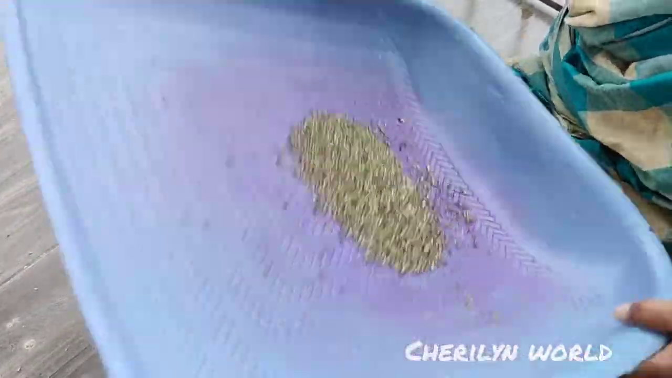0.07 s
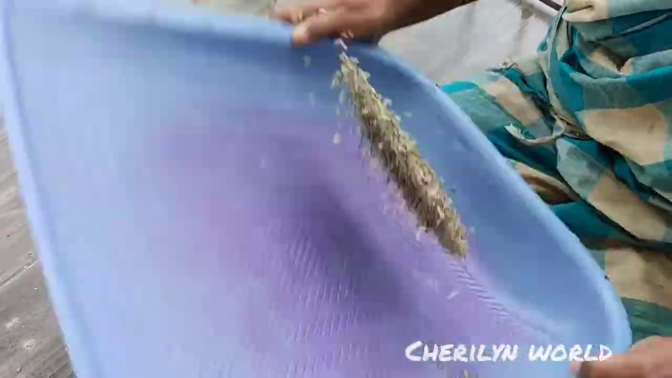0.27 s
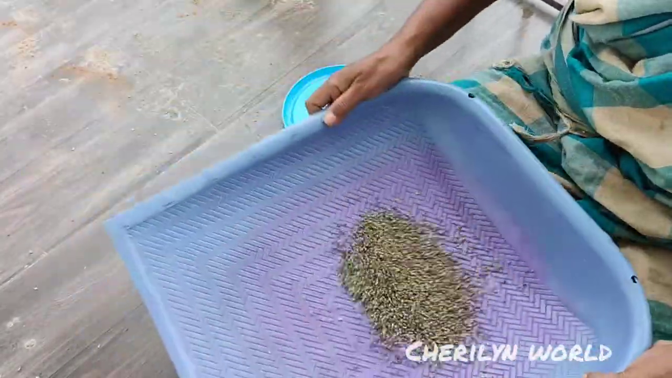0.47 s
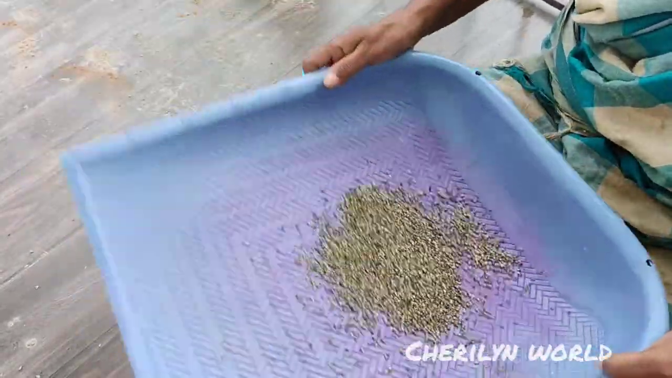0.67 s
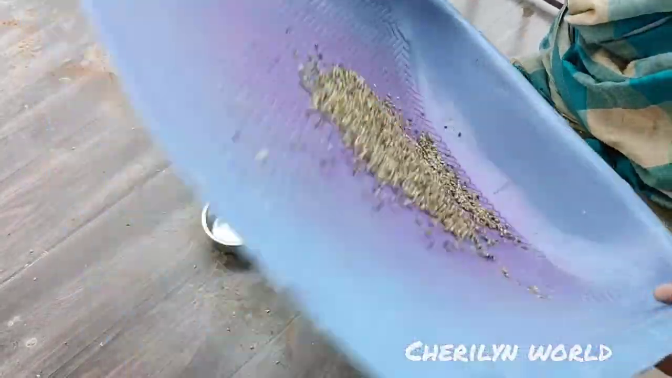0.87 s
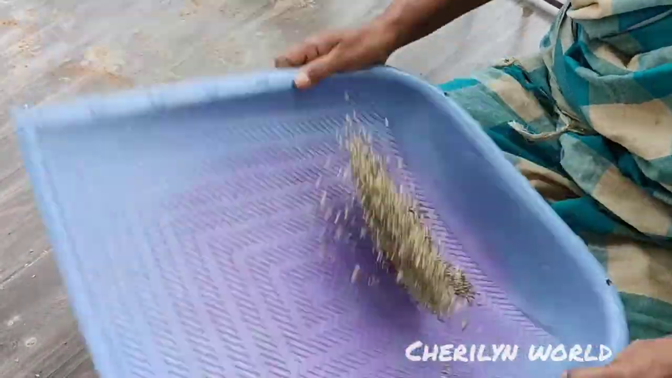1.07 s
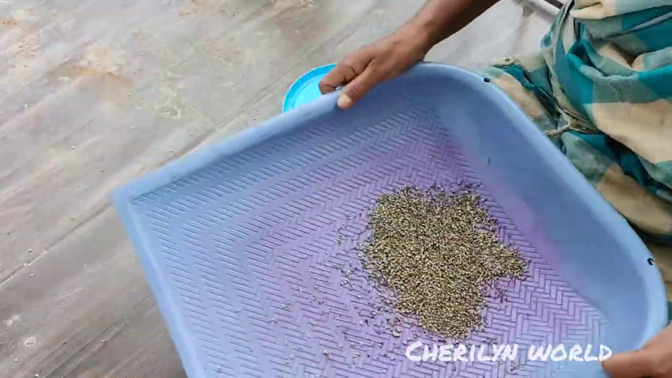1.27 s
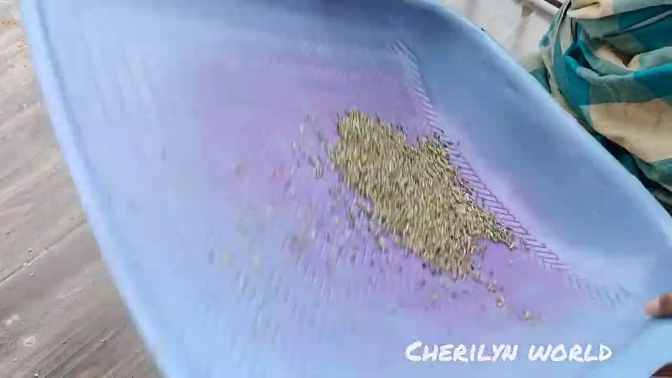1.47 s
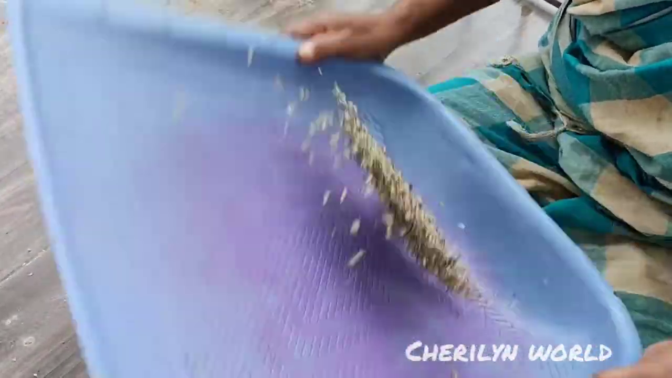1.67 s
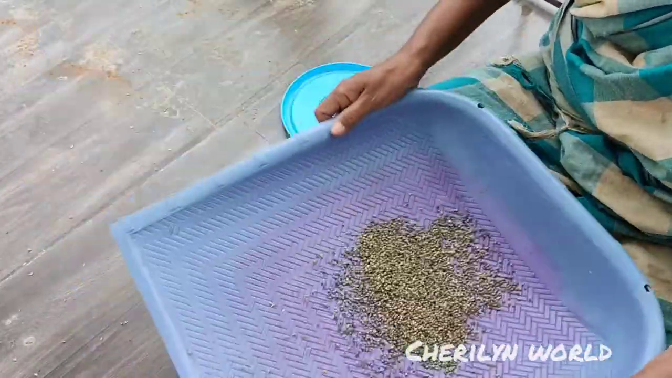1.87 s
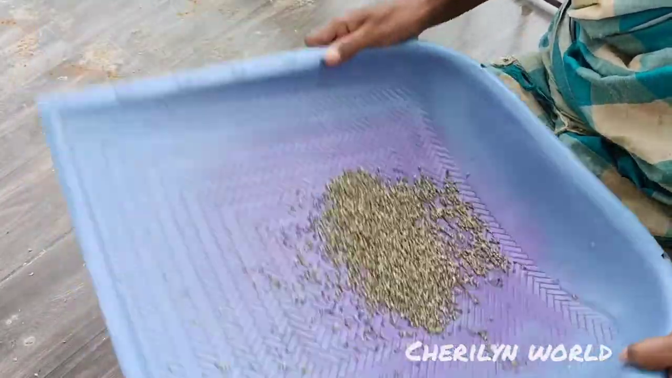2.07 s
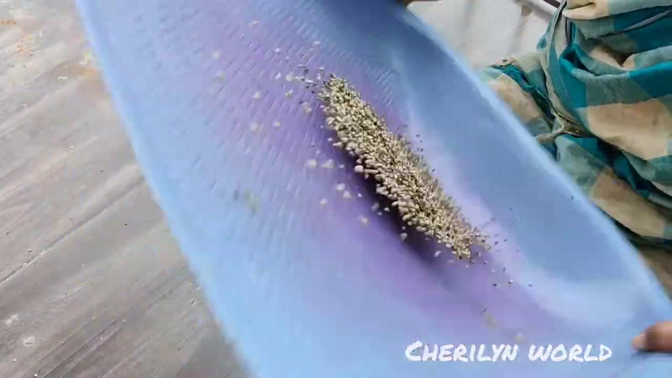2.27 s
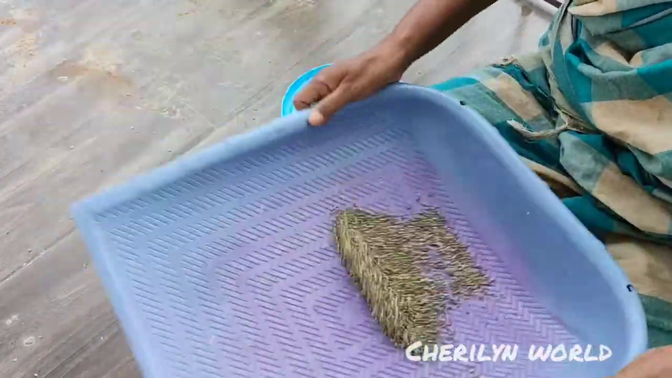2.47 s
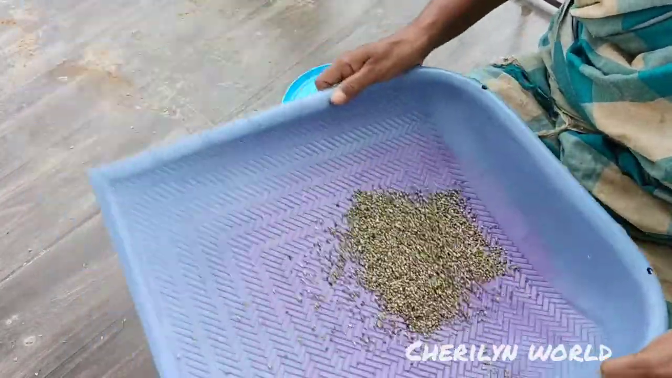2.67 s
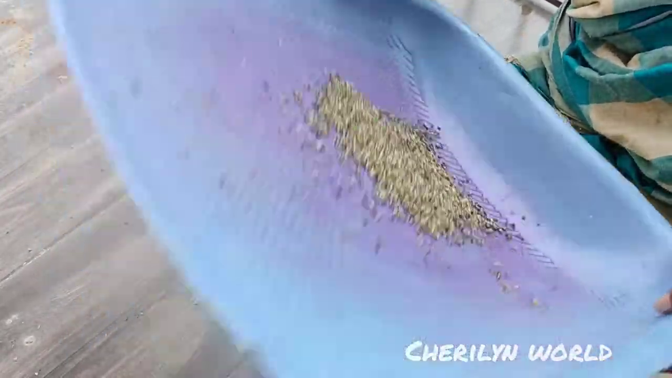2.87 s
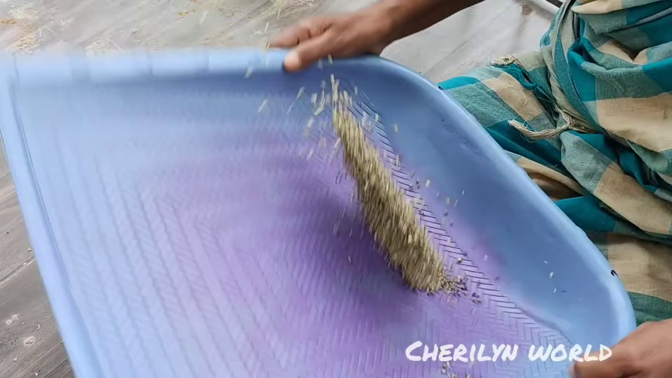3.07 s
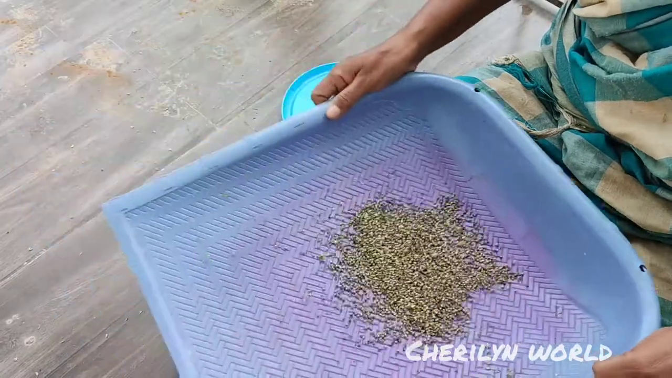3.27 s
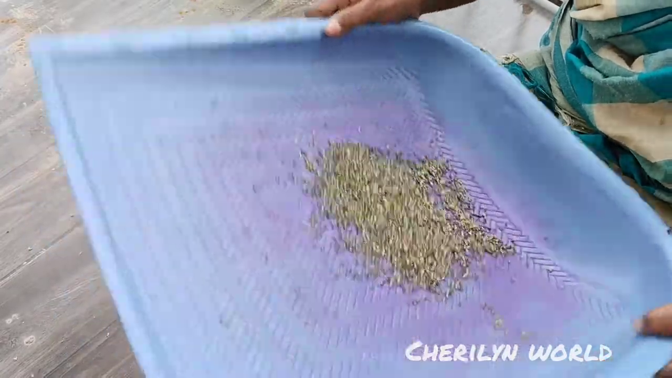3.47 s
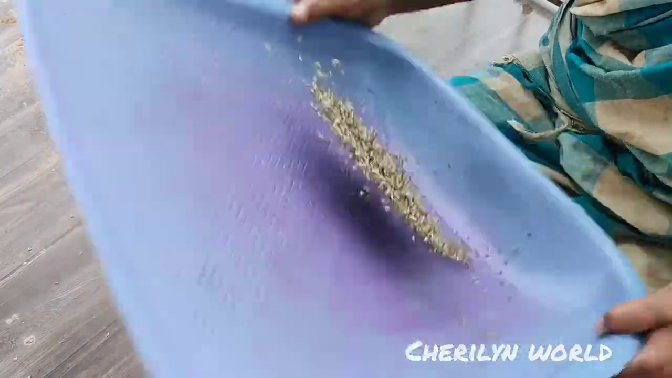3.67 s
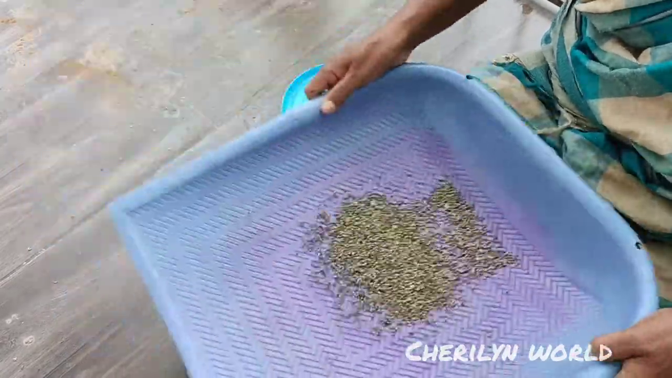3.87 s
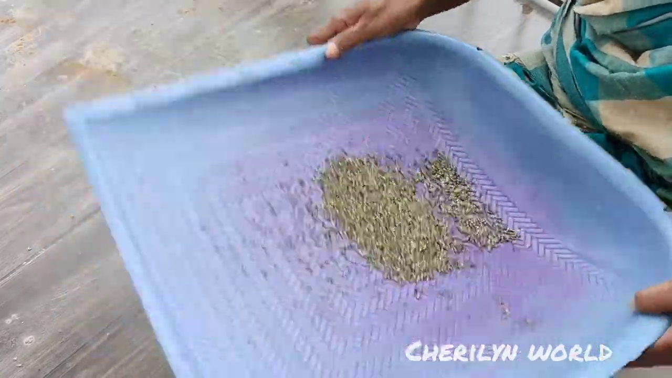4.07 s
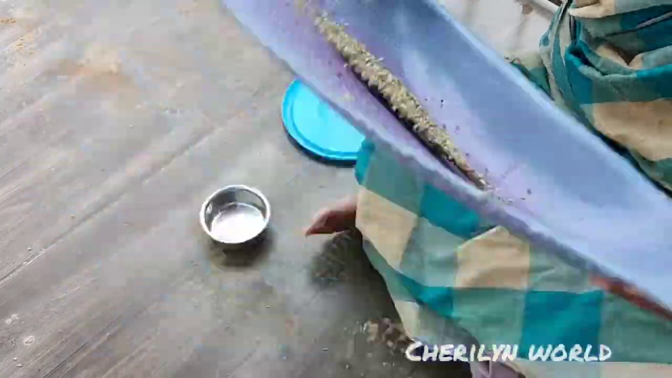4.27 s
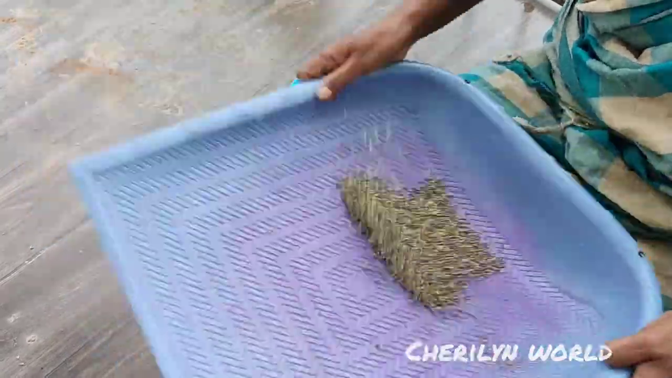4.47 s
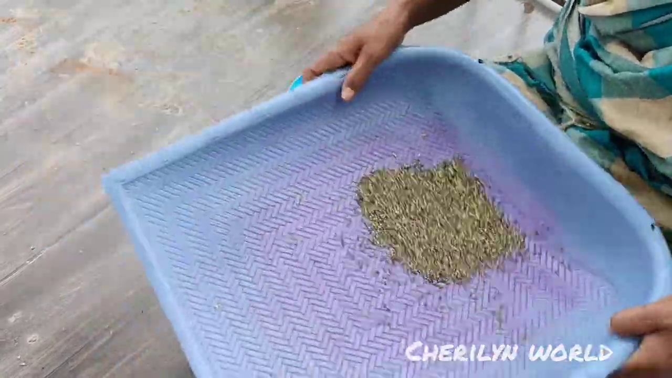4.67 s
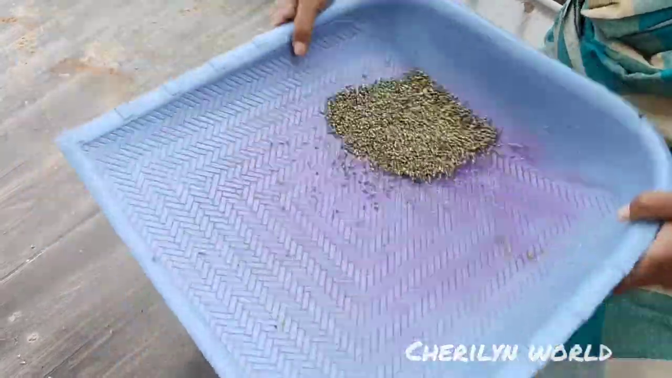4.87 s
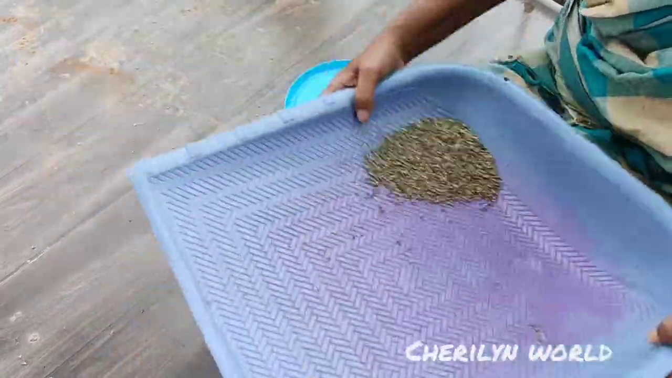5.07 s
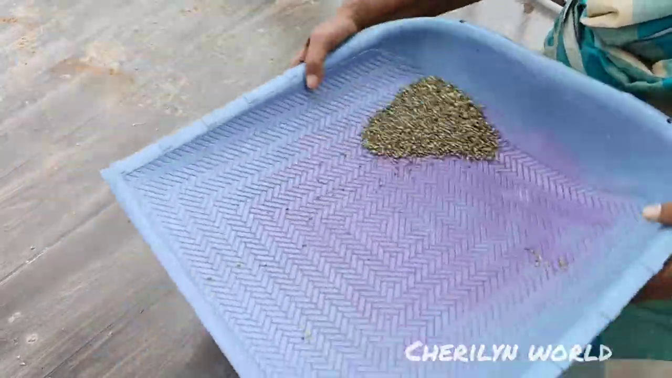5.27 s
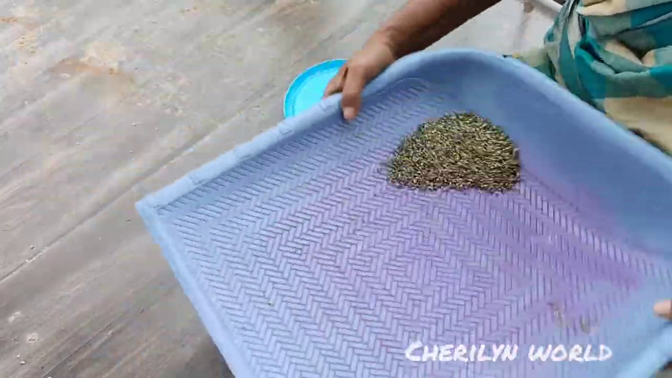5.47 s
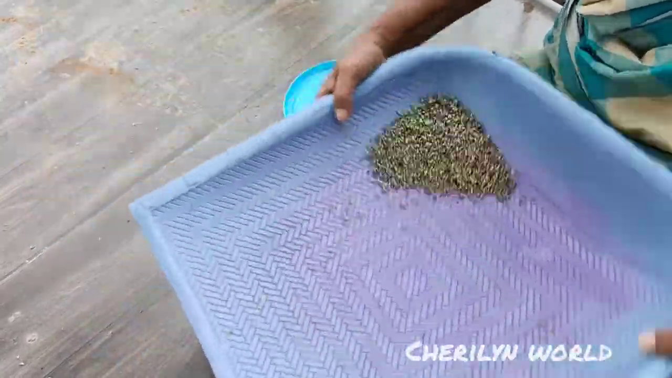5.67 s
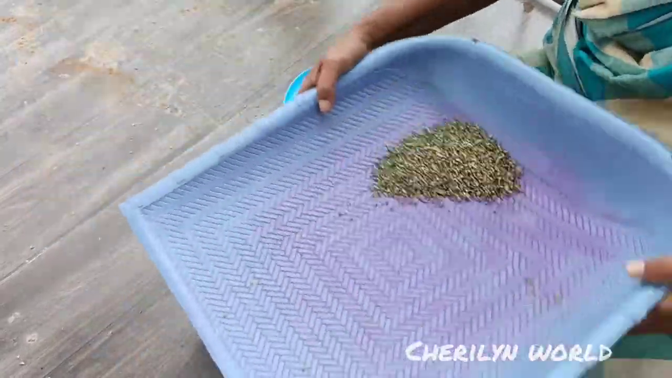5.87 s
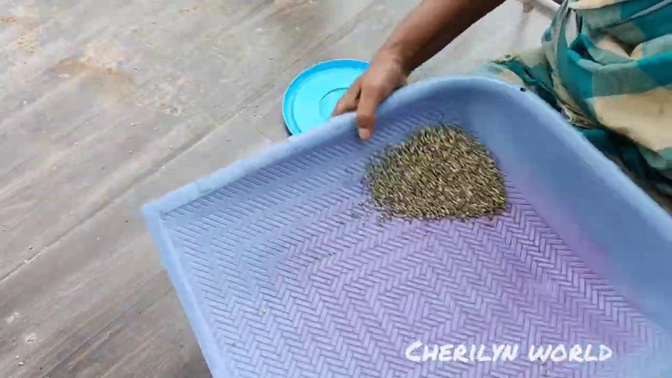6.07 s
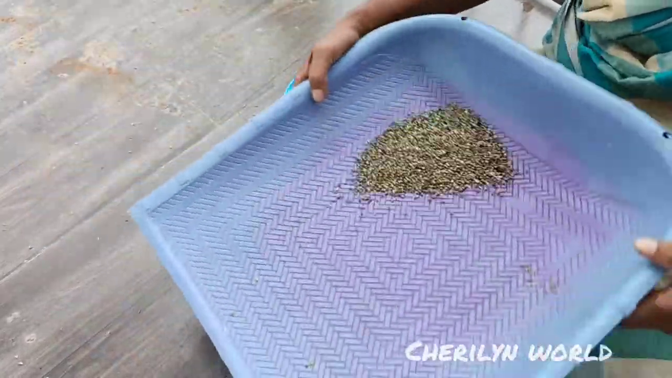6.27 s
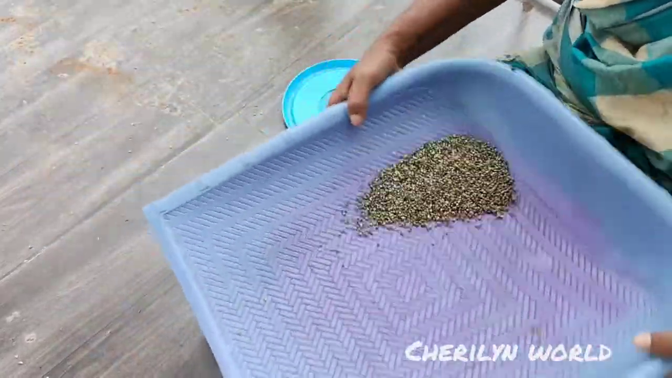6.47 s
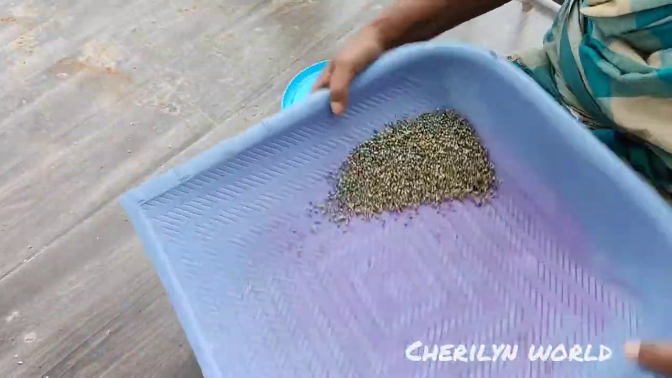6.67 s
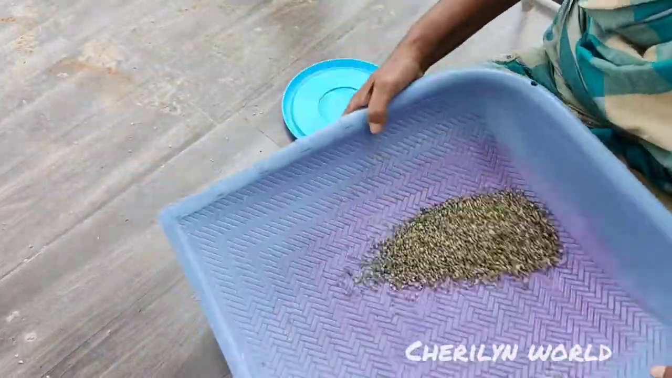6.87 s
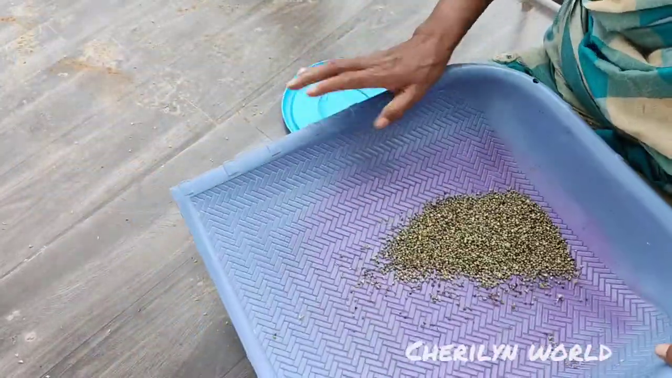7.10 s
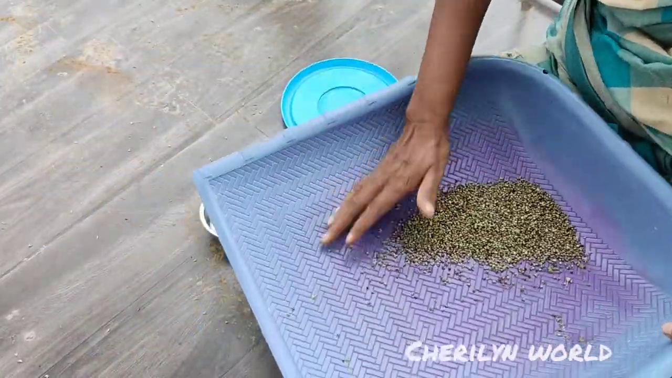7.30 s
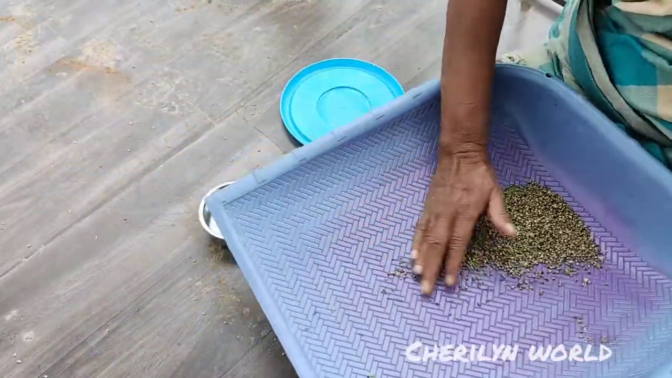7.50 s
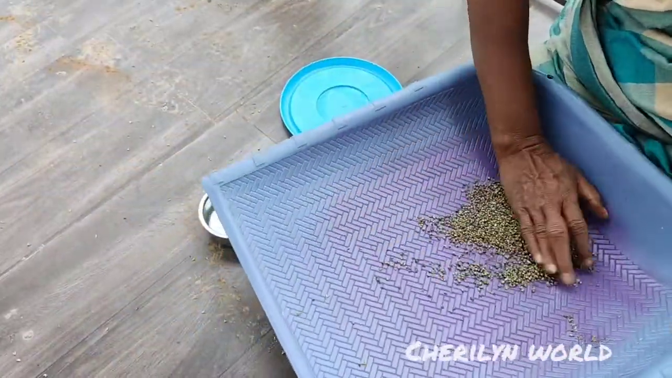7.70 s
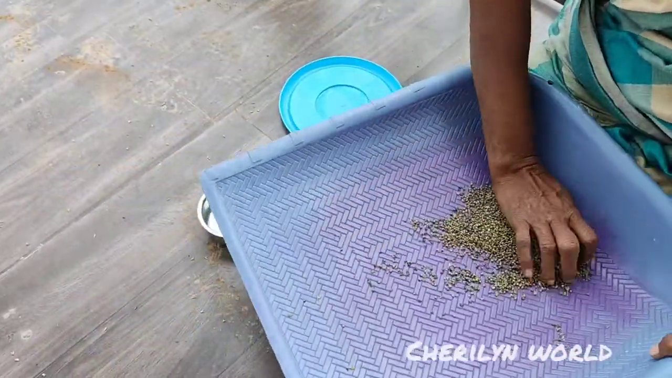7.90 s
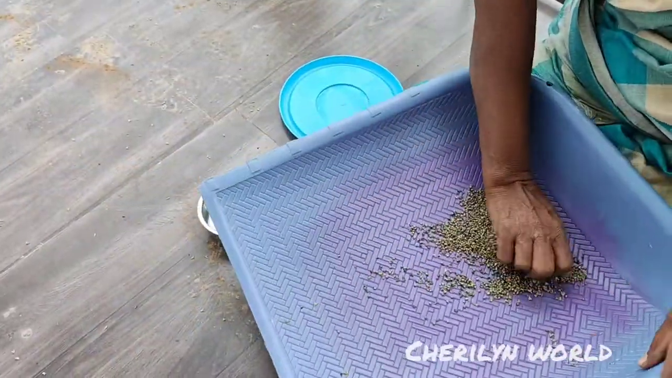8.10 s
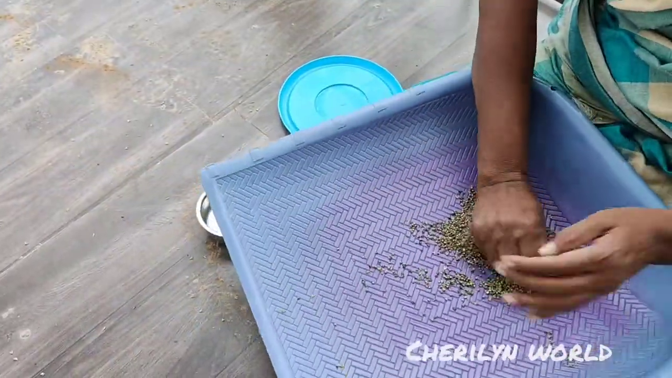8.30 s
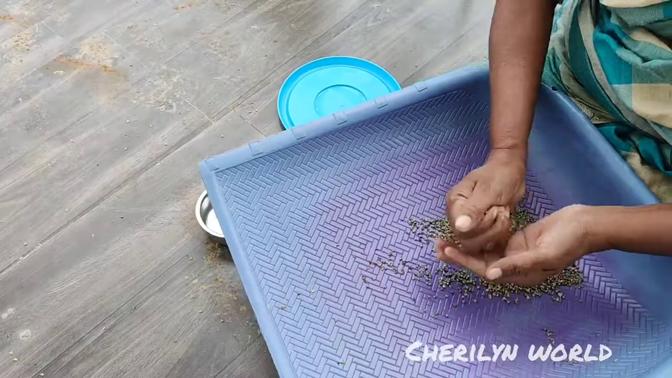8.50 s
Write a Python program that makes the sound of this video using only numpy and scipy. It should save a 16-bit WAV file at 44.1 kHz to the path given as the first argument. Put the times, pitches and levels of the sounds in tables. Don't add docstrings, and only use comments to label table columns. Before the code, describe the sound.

A close stereo microphone in a yard catches seeds being tossed in a plastic tray about every two thirds of a second, crackling and hissing as they land. Then come a dozen quick shakes, a short pause with stray clicks, and a scratchy hand rub that fades. Distant rumble and soft thuds continue throughout.

```python
import sys
import numpy as np
from scipy import signal
from scipy.fft import rfft, irfft
from scipy.io import wavfile
from scipy.ndimage import uniform_filter1d

SR = 44100
rng = np.random.default_rng(int(sys.argv[2]) if len(sys.argv) > 2 else 0)


def decibels_to_gain(level_db):
    exponent = np.asarray(level_db, float) / 20
    return 10 ** exponent


def master_out(mix):
    frames = np.transpose(np.atleast_2d(mix))
    ceiling = np.clip(frames, -1, 1)
    pcm = np.round(ceiling * 32767).astype(np.int16)
    wavfile.write(sys.argv[1], SR, pcm)


N = 376613

# landing in seconds, pour length in seconds, first grains in dB re heap,
# rolling level in dB, end of rolling in seconds after landing.
TOSS_EVENTS = [
    (-.4, 0.19, -7, -34, 0.46),
    (0.299, 0.11, -7.5, -27.5, 0.41),
    (.997, 0.12, -7.5, -29.5, 0.45),
    (1.698, 0.11, -3, -30, 0.4),
    (2.367, 0.11, -4.5, -29, 0.45),
    (3.034, .14, -11, -31.5, .43),
    (3.694, 0.12, -8, -31.5, 0.41),
    (4.365, 0.14, -9, -29, 0.35),
]
# fastest moment in seconds, peak in dB, half length in seconds, tray boom in dB.
SHAKE_EVENTS = [(4.947, -20.5, 0.074, 2.5), (5.117, -29.5, 0.12, -1.5), (5.313, -23.5, 0.067, -22),
                (5.48, -24, 0.091, -1.5), (5.645, -24, 0.074, 2), (5.792, -25, 0.097, 2),
                (5.975, -24.5, 0.082, -2), (6.139, -24.5, 0.11, 4.5), (6.321, -23, 0.071, -8),
                (6.471, -25, 0.096, 3.5), (6.648, -22, 0.069, -15), (6.828, -24.5, 0.15, 5)]
# time in seconds, level in dB.
HAND_PRESSURE = [
    (6.9, -45),
    (7.05, -57),
    (7.16, -54.5),
    (7.44, -44),
    (7.5, -31),
    (7.8, -39.5),
    (8.02, -36.5),
    (8.28, -50),
    (8.54, -57),
]
# time in seconds, drumming in dB, half length in seconds.
TRAY_FLEXES = [
    (2.30, -49, 0.13),
    (3.65, -37.5, 0.055),
    (4.30, -44, 0.023),
    (8.12, -47, 0.11),
]
# time in seconds, left-right difference in dB.
HEAP_SIDE = [(0, 3), (4.6, 2), (5.2, 4.5), (7, 4), (7.5, 4.5), (8.54, 3)]
# frequency in Hz, density in dB per Hz.
CLICK_COLOUR = [(300, -3), (1000, -14), (1650, -12.5), (2200, -2.5), (3100, 1), (4500, -1.5), (6500, -0.5),
                (9000, -5), (11000, -5.5), (13500, -4.5), (16000, -9)]
# frequency in Hz, width in Hz, level in dB.
PANEL_MODES = [(619, 47, -0.5), (663, 57, 2.5), (874, 265, 0.5), (1290, 320, 0.5), (2330, 2350, -13.5)]
# frequency in Hz, width in Hz, level in dB.
BOOM_MODES = [(236, 18, 0), (303.6, 47, 0), (339.4, 30.5, 1), (400.6, 27, -0.5), (460.4, 39, 2),
              (502, 190, -4.5)]
# time in seconds, peak in dB, left-right difference in dB.
STRAY_GRAINS = [(0.2415, -28.5, 25), (0.9664, -50, 0.5), (1.669, -23, 1), (1.82, -3, -3),
                (2.3507, -21, 2.0), (2.995, -26, 5), (3.5428, -22.5, 16), (3.6351, -42, -4),
                (4.284, -26, 20), (4.361, -14, 13), (7.06, -24.5, 13), (7.318, -14, 3), (7.399, -25, 10),
                (7.47, -6, 2), (7.5413, -6, 4.5), (8.3103, -19.5, 17), (8.489, -21, 5), (8.509, -18.5, 21)]
# time in seconds, peak in dB, 60 dB decay in seconds, tilt in dB per band, direct blow in dB.
KNOCK_EVENTS = [(0.033, -27.5, 0.73, -2, 0), (0.506, -26, 0.61, 0.5, -10), (0.964, -23, 0.47, -1, -1),
                (1.367, -28, 0.77, -1.5, 2), (2.287, -49, 0.23, -6, -2), (2.49, -34, 0.34, -1, 4),
                (2.69, -33.5, 0.53, -4.5, 2), (2.854, -47, 0.14, 2, -5), (3.575, -30.5, 0.6, -5, -2),
                (3.631, -25.5, 0.29, -9, -5), (5.61, -32.5, 0.18, -10, 4), (6.091, -29, 0.25, 7, -2),
                (7.081, -34, 1, -4, -1.5), (7.292, -32.5, 0.25, -3, 0), (7.396, -43.5, 0.12, 2, 0),
                (7.498, -35, 0.52, 2, -11), (7.722, -33, 0.13, 16, 9), (8.056, -35, 1, 3, 6),
                (8.322, -26.5, 0.21, 0, 1.5)]
# low edge in Hz, high edge in Hz, level in dB, delay in seconds, share of the decay time.
BANDS_OF_KNOCK = [(68.7, 154, -9, 0.08, 1.28), (147, 260, 1, 0.013, 0.69), (263, 530, 3, 0.00073, 0.67),
                  (510, 800, 1, .001, 0.26)]
# time in seconds, level in dB.
RUMBLE_LEVEL = [(0, -46.5), (2.3, -46), (3, -47.5), (4.4, -48.5), (5.5, -49), (7.3, -52.5), (8.54, -50)]
# time in seconds, peak in dB, half
# length in seconds.
RUMBLE_HEAVES = [(.12, -39, 0.083), (.57, -41.5, 0.09), (1.02, -44, 0.12), (1.26, -53, 0.061),
                 (1.47, -43.5, 0.2), (2.51, -37, 0.058), (2.73, -51, 0.071), (2.9, -38.5, 0.062),
                 (3.19, -42.5, 0.15), (3.62, -36.5, 0.073), (4.58, -47, 0.17), (4.95, -50, 0.21),
                 (5.15, -51, .1), (6.17, -40.5, 0.14), (7.66, -43, 0.15), (8.16, -48, 0.054)]
# frequency in Hz, density in dB per Hz.
RUMBLE_SPECTRUM = [(15, -36), (25, -3), (81, 4), (118, -5), (168, 2.5), (286, -16), (400, -11.5),
                   (520, -30), (880, -120)]
# frequency in Hz, density in dB per Hz.
WASH_SPECTRUM = [(150, -36), (250, -4), (403, -13.5), (506, -4.5), (896, -6), (1670, -11), (2070, -11),
                 (6000, -22.5), (7800, -29.5), (13200, -120)]
# resonance in Hz, width in Hz, treble cut in Hz, level in dB.
MIC_PORTS = [
    (8787, 735, 21500, 0),
    (7680, 685, 10000, -1),
]
# frequency in Hz, limit in dB re neighbours.
DROPOUT_LIMITS = [(1200, -9), (2200, -1.8), (6500, -1.1), (7200, -5), (9300, -5), (10000, -.2), (15000, .6)]

LAND_S, HEAP_DB, SWELL_SHARE = 0.025, -17.5, 0.78
POUR_END_DB_PER_S, ROLL_DB_PER_S, STOP_DB_PER_S = 173, 38, 142.5
TURN_DB, SHAKE_SKEW = 13, 0.88
TOSS_BOOM_DB, HAND_BOOM_DB = 5.5, 10
STILL_DB, IDLE_DRUM_DB = -77, -54.5
DRUM_DB, DRUM_SLOPE, DRUM_LAG_S, BOOM_LAG_S = -12, -0.02, 0.0027, 0.03
POUR_PAN = -0.077
HAND_DULLS_DB = -3
GRAIN_SPREAD_DB = 1.5
PORT_SPACING_S = 0.00035
HEAP_ANGLE, HEAP_SPREAD = -0.7, 0.7
KNOCK_RISE_S = 0.0066
HEAVE_EDGE_DB, HEAVE_SKEW = 25.5, 1.42
YARD_DB = -52.5
ROOM_T60_S, ROOM_DB = 0.15, -11.5


def grains():
    rattle_db, drum_db, boom_db, pan_db = motion()
    hits = impacts(rattle_db)
    rattle = rms_one(colour(hits, CLICK_COLOUR)) * decibels_to_gain(rattle_db - 6.0)
    air = butter_sos(rattle, 2, 10500, "high")
    hand_db = HAND_DULLS_DB * (np.arange(N) > 7.0 * SR)
    air_db = 0.21 * np.clip(rattle_db + 54, -25, 15) + hand_db
    rattle = rattle + air * (decibels_to_gain(air_db) - 1)
    drum = body(hits, PANEL_MODES) * decibels_to_gain(drum_db - 1.0)
    boom = body(0.39 * hits[0] + 0.41 * hits, BOOM_MODES) * decibels_to_gain(boom_db - 8.5)
    sound = butter_sos(rattle + drum + boom, 4, 215, "high")
    return sound * decibels_to_gain(np.array([[0.4], [-0.4]]) * (pan_db - 2.5))


def motion():
    tossed = tosses()
    shaken = swells(SHAKE_EVENTS, TURN_DB, SHAKE_SKEW)
    rubbed = np.where(np.arange(N) / SR > HAND_PRESSURE[0][0], in_time(HAND_PRESSURE)[0], -120)
    rattle_db = louder(tossed, *shaken, rubbed, STILL_DB)

    driven_db = DRUM_DB + DRUM_SLOPE * (rattle_db + 15)
    drumming = lagging(rattle_db + driven_db, DRUM_LAG_S)
    drum_db = louder(drumming, IDLE_DRUM_DB, *swells(TRAY_FLEXES, TURN_DB, 1))

    shaken_boom = [db + row[3] for db, row in zip(shaken, SHAKE_EVENTS)]
    booming = louder(tossed + TOSS_BOOM_DB, rubbed + HAND_BOOM_DB, *shaken_boom)
    boom_db = louder(lagging(np.maximum(booming, -60) + driven_db, BOOM_LAG_S), IDLE_DRUM_DB - 1.0)
    pan_db = in_time(HEAP_SIDE)[0] + POUR_PAN * np.maximum(tossed + 26, 0)
    return rattle_db, drum_db, boom_db, pan_db


def tosses():
    t, levels = np.arange(N) / SR, []
    for s, pour, first_db, roll_db, stop in TOSS_EVENTS:
        fall_s = [0, LAND_S * 0.27, LAND_S, pour * SWELL_SHARE, pour, pour + 1]
        fall_db = [-45, first_db - 8, first_db, 0, -1, -7 - POUR_END_DB_PER_S]
        falling = np.interp(t - s, fall_s, fall_db) + HEAP_DB
        stop_db = roll_db - ROLL_DB_PER_S * (stop - pour)
        rolling = np.interp(t - s, [0, pour, stop, stop + 1], [-90, roll_db, stop_db, stop_db - STOP_DB_PER_S])
        levels += [np.where(t > s, falling, -120), rolling - 40 * (t < s)]
    return louder(*levels)


def impacts(rattle_db):
    per_s = np.clip(9000 * decibels_to_gain(0.45 * (rattle_db + 21.5) + 2.5 * drift(25)), 200, 30000)
    sizes = decibels_to_gain(GRAIN_SPREAD_DB * np.minimum(rng.exponential(1, N), 4.5)) * rng.choice([-1, 1], N)
    left = sizes * (rng.random(N) < per_s / SR)
    left /= np.sqrt(np.clip(9000 * decibels_to_gain(0.29 * (rattle_db + 20)), 200, 30000))
    at = np.flatnonzero(left)
    spot = HEAP_ANGLE + HEAP_SPREAD * rng.uniform(-1, 1, len(at))
    lag = (spot * PORT_SPACING_S * SR).astype(int)
    right = np.zeros(N)
    np.add.at(right, np.clip(at + lag, 0, N - 1), left[at] * decibels_to_gain(rng.normal(0, 0.88, len(at))))
    return rms_one(np.array([left, right]))


def body(x, modes):
    out = 0
    for k, (hz, width_hz, db) in enumerate(modes):
        out = out + (-1) ** k * decibels_to_gain(db) * resonance(x, hz, width_hz)
    return rms_one(out)


def lagging(db, lag_s):
    r = np.exp(-1 / (lag_s * SR))
    return signal.lfilter([1 - r], [1, -r], db - db[0]) + db[0]


def strays():
    out = np.zeros((2, N))
    for s, db, pan_db in STRAY_GRAINS:
        for late_s, loss_db in ((0, -13), (0.0013, -12.5), (0.0034, -12.5)):
            sides_db = np.array([0.5, -0.5]) * pan_db
            out[:, round((s + late_s) * SR)] = decibels_to_gain(db + 3.0 + loss_db + sides_db)
    bright = signal.lfilter(*signal.butter(1, [4500, 10500], "band", fs=SR), out)
    return colour(bright, CLICK_COLOUR)


def knocks():
    out, blows, t = np.zeros(N), np.zeros(N), np.arange(SR) / SR
    for s, db, t60, tilt_db, blow_db in KNOCK_EVENTS:
        noise, i = rng.standard_normal(SR), round(s * SR)
        blows[i] = decibels_to_gain(db + blow_db + 40.5)
        for k, (low_hz, high_hz, band_db, delay, share) in enumerate(BANDS_OF_KNOCK):
            dull = rms_one(butter_sos(noise, 3, [low_hz, high_hz], "band"))
            rise = np.minimum(t / (KNOCK_RISE_S + delay), 1)
            swell = rise * decibels_to_gain(-60 * t / (t60 * share))
            level = decibels_to_gain(db - 10.5 + band_db + tilt_db * (k - 2))
            out[i:i + SR] += (dull * swell)[:N - i] * level
    soft = butter_sos(blows + 1e-18, 4, 600, "low")
    hollow = resonance(soft, 336, 70) - 0.7 * resonance(soft, 480, 84) + 0.5 * resonance(soft, 480, 200)
    return (out + hollow) * decibels_to_gain(np.array([[1.5], [-1.5]]))


def room(x):
    t = np.arange(SR // 2) / SR
    shared, own = rng.standard_normal(len(t)), rng.standard_normal((2, len(t)))
    noise = own + signal.lfilter(*signal.butter(1, 1400, fs=SR), shared - own)
    dull = signal.lfilter(*signal.butter(1, 3500, fs=SR), noise)
    tail = dull * decibels_to_gain(-60 * t / ROOM_T60_S) * (t > 0.002)
    return signal.oaconvolve(x, tail / np.sqrt(np.sum(tail ** 2) / 2), axes=1)[:, :N]


def yard():
    shared, own = rng.standard_normal((2, N)), rng.standard_normal((2, 2, N))
    rumble_db = louder(in_time(RUMBLE_LEVEL)[0], *swells(RUMBLE_HEAVES, HEAVE_EDGE_DB, HEAVE_SKEW))
    rumble = rms_one(colour(shared[0] + 0.32 * own[0], RUMBLE_SPECTRUM)) * decibels_to_gain(rumble_db)
    wash = rms_one(colour(shared[1] + 2.5 * own[1], WASH_SPECTRUM)) * decibels_to_gain(YARD_DB - 2.0)
    wind = rms_one(butter_sos(own[0, 0] - own[0, 1], 2, [18, 45], "band"))
    rumble = rumble + wind * decibels_to_gain(-58.5) * np.array([[1], [-1]])
    return rumble * decibels_to_gain(np.array([[2.3], [-2.3]])) + wash * decibels_to_gain(np.array([[1.1], [-1.1]]))


def swells(rows, edge_db, skew):
    t, levels = np.arange(N) / SR, []
    for s, db, half, *_ in rows:
        away = (t - s) / np.where(t > s, half * skew, half)
        levels.append(db - np.minimum(edge_db * away ** 2, 90))
    return levels


def louder(*levels_db):
    return 10 * np.log10(sum(decibels_to_gain(2 * db) for db in levels_db))


def in_time(rows):
    s, *columns = np.transpose(rows)
    return [np.interp(np.arange(N) / SR, s, c) for c in columns]


def drift(rate_hz):
    r = np.exp(-2 * np.pi * rate_hz / SR)
    return rms_one(signal.lfilter([1], [1, -2 * r, r * r], rng.standard_normal(N + SR))[SR:])


def resonance(x, hz, width_hz):
    r = np.exp(-np.pi * width_hz / SR)
    gain = (1 - r * r) / 2
    return signal.lfilter([gain, 0, -gain], [1, -2 * r * np.cos(2 * np.pi * hz / SR), r * r], x)


def colour(x, points):
    points_hz, points_db = np.transpose(points)
    hz = np.fft.rfftfreq(8192, 1 / SR)
    db = np.interp(np.log(hz + 1), np.log(points_hz), points_db)
    cepstrum = irfft(np.log(decibels_to_gain(db)))
    cepstrum[1:4096] *= 2
    cepstrum[4097:] = 0
    return signal.oaconvolve(x, irfft(np.exp(rfft(cepstrum)))[None], axes=1)[:, :N]


def butter_sos(x, order, hz, kind):
    return signal.sosfilt(signal.butter(order, hz, kind, fs=SR, output="sos"), x)


def rms_one(x):
    return x / np.sqrt(np.mean(x ** 2) + 1e-20)


def scene():
    near = grains() + strays() + knocks()
    return near + decibels_to_gain(ROOM_DB) * room(near) + yard()


def starve(x):
    sum_and_difference = np.array([x[0] + x[1], x[0] - x[1]]) / 2
    hz, _, z = signal.stft(sum_and_difference, SR, nperseg=2048)
    bands = np.mean(np.abs(z[:, :1024].reshape(2, 128, 8, -1)) ** 2, axis=2)
    bands = uniform_filter1d(bands, size=2, axis=2)
    around = np.exp(uniform_filter1d(np.log(bands + 1e-20), size=7, axis=1))
    points_hz, points_db = np.transpose(DROPOUT_LIMITS)
    limit_db = np.interp(np.log(hz[4::8]), np.log(points_hz), points_db, left=-40)
    z[:, :1024] *= np.repeat(bands > around * decibels_to_gain(2 * limit_db)[:, None], 8, axis=1)
    mid, side = signal.istft(z, SR, nperseg=2048)[1][:, :N]
    return np.array([mid + side, mid - side])


def band_limit(x):
    return signal.sosfilt(signal.butter(12, 15810, fs=SR, output="sos"), x)


def record(dry):
    ports = np.zeros_like(dry)
    for k, (hz, width_hz, cut_hz, db) in enumerate(MIC_PORTS):
        pole = np.exp((-np.pi * width_hz + 2j * np.pi * hz) / SR)
        a = [1, -2 * pole.real, abs(pole) ** 2]
        dull = signal.lfilter(*signal.butter(1, cut_hz, fs=SR), dry[k])
        ports[k] = decibels_to_gain(db) * signal.lfilter([sum(a)], a, dull)
    overloaded = np.tanh(ports / 1.337) * 1.263
    top = signal.cheby2(18, 50, 16000, fs=SR, output="sos")
    mix = signal.sosfilt(top, starve(overloaded))
    return band_limit(mix)


dry = scene()
out = record(dry)
master_out(out)
```